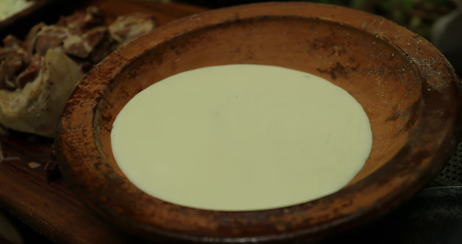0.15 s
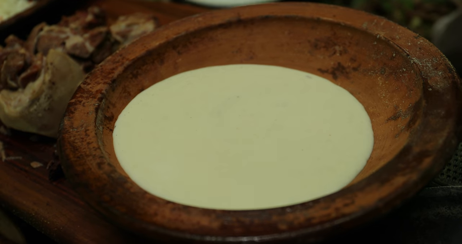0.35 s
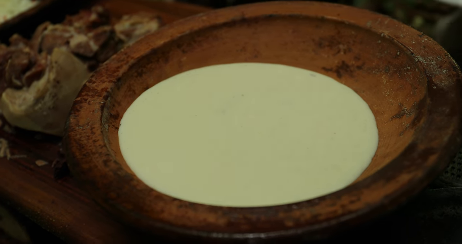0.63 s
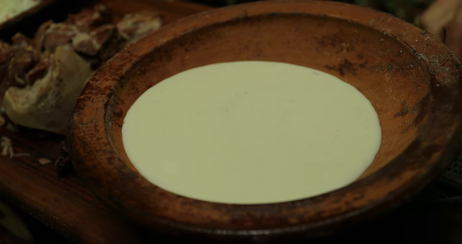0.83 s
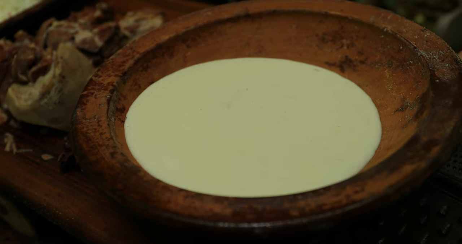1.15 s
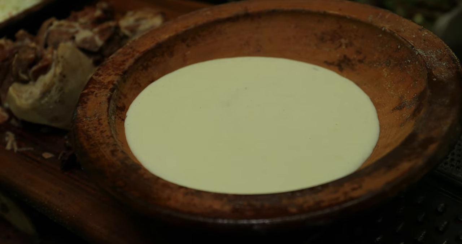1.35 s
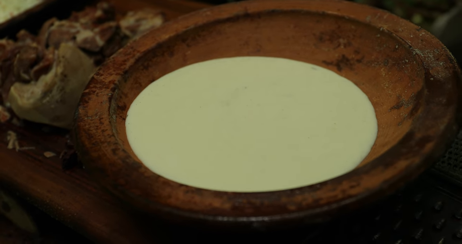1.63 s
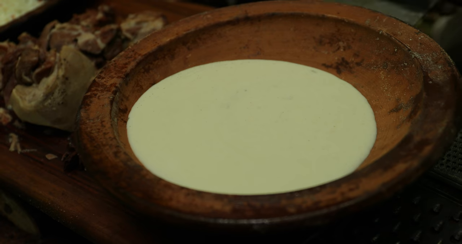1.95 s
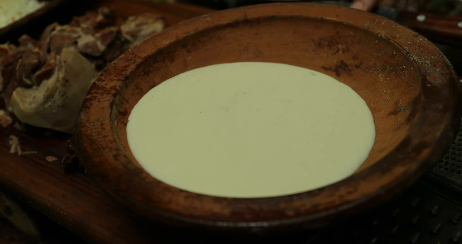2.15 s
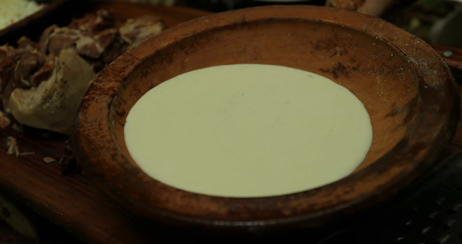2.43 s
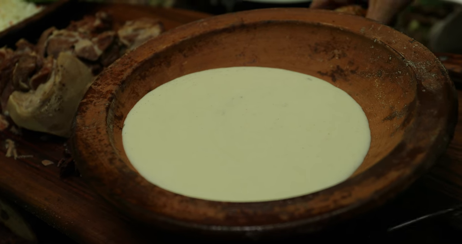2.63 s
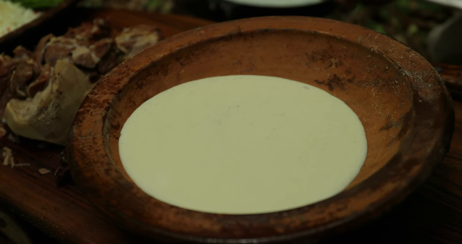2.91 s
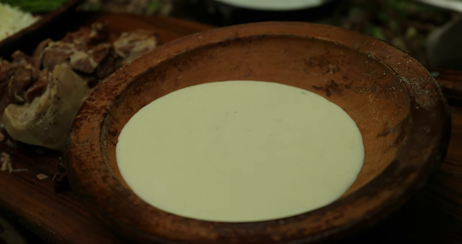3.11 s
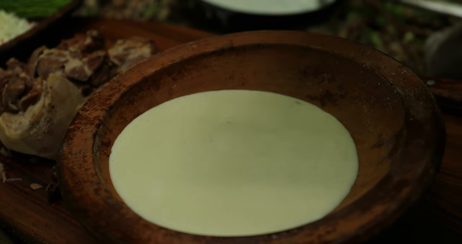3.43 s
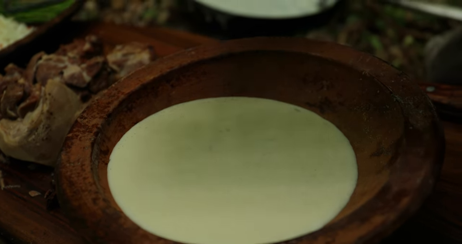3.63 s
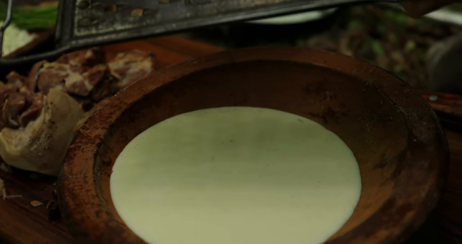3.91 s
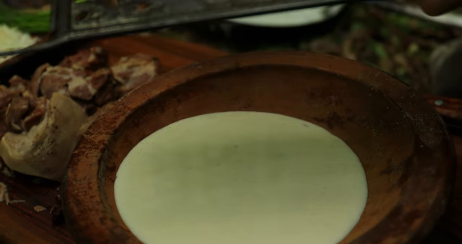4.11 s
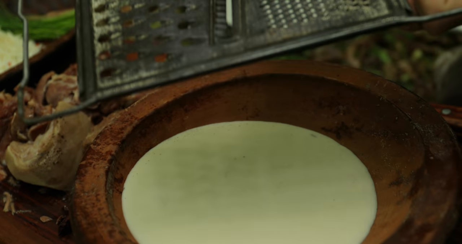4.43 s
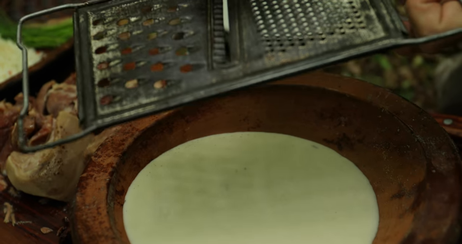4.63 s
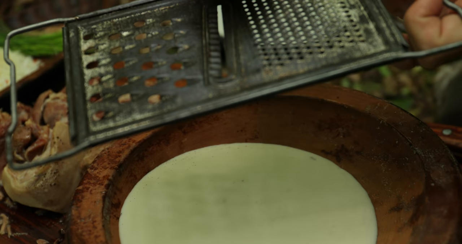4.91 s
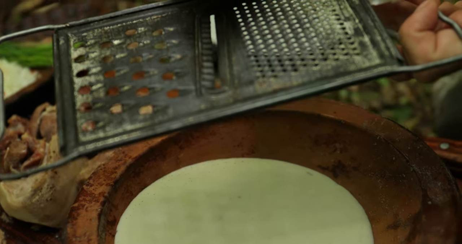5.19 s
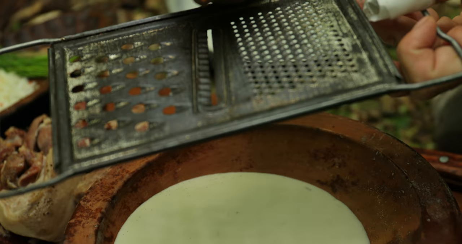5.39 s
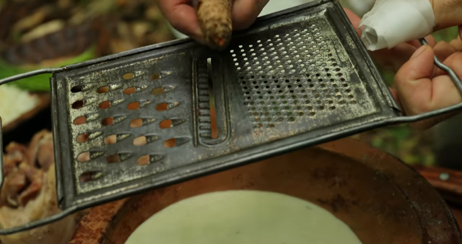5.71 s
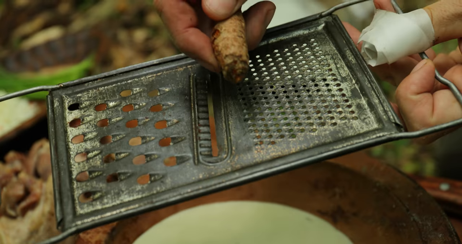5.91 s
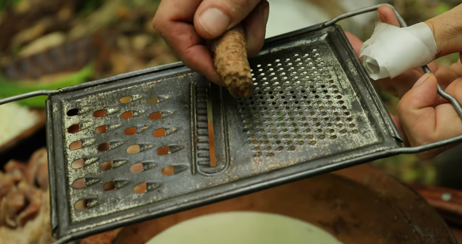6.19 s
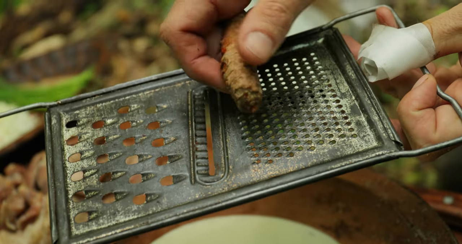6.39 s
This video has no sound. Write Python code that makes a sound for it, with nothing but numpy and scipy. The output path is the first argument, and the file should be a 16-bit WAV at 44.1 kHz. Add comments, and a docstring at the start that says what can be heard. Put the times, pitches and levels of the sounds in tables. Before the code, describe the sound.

Very close at an outdoor wooden table, a utensil lands with a sharp woody-metal clack. A tin grater is dragged in a long gritty scrape with light rattles, then after a pause is moved again in short scrapes and heavier knocks. From about three seconds only small handling ticks and faint dry rustles remain, with distant echoing birds, tiny watery blips and a low rumble that booms late.

```python
"""Outdoors at a wooden table, beside a dish of sauce: a utensil clacks down (damped modes and a noise crack),
then a tin grater is dragged, knocks and ticks (slips and short contacts ringing its modes).
Small birds sing far off among trees (gliding whistles, mostly echo) over a soft hush, dry rustles,
faint watery blips and a low rumble with booms. A limiter dips the whole mix briefly after its highest peaks.
"""
import sys
import numpy as np
from scipy import signal
from scipy.fft import rfft, irfft, next_fast_len
from scipy.io import wavfile
from scipy.ndimage import uniform_filter1d, minimum_filter1d, map_coordinates

SR = 44100
rng = np.random.default_rng(int(sys.argv[2]) if len(sys.argv) > 2 else 0)


def persist_wave(psi):
    """Save psi, clipped to +-1, as 16-bit WAV."""
    counts = np.round(np.clip(psi, -1, 1) * 32767).astype(np.int16)
    wavfile.write(sys.argv[1], SR, np.atleast_2d(counts).T)


N = 288836  # samples


def amp(db):
    """Decibels to gain."""
    return 10 ** (np.asarray(db) / 20)


def unit(x):
    """Scale to rms 1."""
    return x / np.sqrt(np.mean(x ** 2) + 1e-20)


def along(points, hz):
    """Read (Hz, value) points on a log frequency axis."""
    point_hz, value = np.transpose(points)
    return np.interp(np.log(hz + 1), np.log(point_hz + 1), value)


def wobble(knots_per_s):
    """Smooth random curve through normal-distributed knots."""
    knots = rng.standard_normal(int(N * knots_per_s / SR) + 4)
    return map_coordinates(knots, [np.arange(N) * knots_per_s / SR])


def filtered(x, response):
    """Multiply the spectrum of x by response(hz)."""
    n = x.shape[-1]
    padded = next_fast_len(n + SR // 10)
    spectrum = rfft(x, padded) * response(np.fft.rfftfreq(padded, 1 / SR))
    return irfft(spectrum, padded)[..., :n]


def coloured(x, spectrum):
    """Shape x by a (Hz, dB) spectrum, at rms 1."""
    return unit(filtered(x, lambda hz: amp(along(spectrum, hz))))


def cut(x, hz, kind, order):
    """Causal low-pass or high-pass."""
    corner_hz = min(hz, SR / 2 - SR / 20)
    return signal.sosfilt(signal.butter(order, corner_hz, kind, fs=SR, output="sos"), x)


def fade(t, t60):
    """Exponential decay, 60 dB in t60 seconds."""
    return np.exp(-np.log(1000) * t / t60)


def add(track, s, sound):
    """Mix a sound into a track from time s."""
    part = track[max(round(s * SR), 0):][:len(sound)]
    part += sound[:len(part)]


def ring(modes, t, strengths=1):
    """Sum of damped sine modes, each at its own strength."""
    hz, db, t60 = np.transpose(modes)[:, :, None]
    return (strengths * amp(db) * np.sin(2 * np.pi * hz * t) * fade(t, t60)).sum(0)


def grains(rate_per_s):
    """Tiny slips at random moments and of uneven size."""
    happens = rng.random(N) < rate_per_s / SR
    return happens * rng.standard_normal(N) * amp(2 * rng.standard_normal(N))


def swells(rows):
    """Gain of bell-shaped swells from (crest_s, half_width_s, level_db) rows."""
    t = np.arange(N) / SR
    return sum(amp(db) * np.exp(-((t - s) / width) ** 2) for s, width, db in rows)


def rush(spectrum, alike):
    """Stereo noise of rms 1; the mid-side balance sets the likeness of the sides."""
    def turn(hz):
        return np.arccos(np.clip(along(alike, hz), -1, 1)) / 2

    def mid_side(hz):
        return amp(along(spectrum, hz)) * [np.cos(turn(hz)), np.sin(turn(hz))]

    mid, side = filtered(rng.standard_normal((2, N)), mid_side)
    return unit(np.array([mid + side, mid - side]))


# hush spectrum: hz, relative level_db
AIR_SPECTRUM = [(59, -18), (100, -1), (244, -6.5), (295, -9), (389, -12), (524, -18.5), (648, -19.5),
                (691, -22), (910, -25.5), (1390, -22.5), (2130, -24), (2420, -24.5), (3190, -27.5),
                (5300, -28), (16000, -40)]
# left-right likeness of the hush: hz, correlation (-1 to 1)
AIR_LIKENESS = [(60, 0.99), (130, 0.93), (290, 0.95), (640, 0.87), (1410, 0.94), (3100, 0.61), (6820, 0.1),
                (15000, -0.28)]
HUSH_DB = -43.5


def air():
    """Hush of the woods: shaped stereo noise with a slight level waver."""
    return amp(HUSH_DB + 0.39 * wobble(5.2)) * rush(AIR_SPECTRUM, AIR_LIKENESS)


# rumble spectrum: hz, relative level_db
RUMBLE_SPECTRUM = [(20, -45), (26, -20), (31, -3), (38, -7), (47, 6), (57, 1), (72, -4), (100, -10),
                   (140, -16), (220, -24.5), (400, -56)]
# booms of the microphone support: crest_s, half_width_s, pitch_hz, level_db (before the left-right tilt)
SUPPORT_BOOMS = [(2.1, 0.27, 53.6, -36), (5.085, 0.041, 53.6, -25), (5.16, 0.056, 41.1, -26.5),
                 (5.6, 0.12, 43.7, -32.5), (5.88, 0.083, 57.7, -21), (6.13, 0.12, 55.74, -32.5)]


def rumble():
    """Low wavering noise; the microphone support booms in bell-shaped sine swells."""
    t = np.arange(N) / SR
    boom = np.zeros(N)
    for crest_s, half_width_s, hz, db in SUPPORT_BOOMS:
        tone = np.sin(2 * np.pi * (hz * t + rng.random()))
        boom += swells([(crest_s, half_width_s, db)]) * tone
    bed = amp(-40.0 + 2.7 * wobble(3.5)) * rush(RUMBLE_SPECTRUM, [(30, 0.072), (60, 0.27), (120, 0.99)])
    return amp([[1.5], [-1.5]]) * (bed + boom)  # louder at left


# rustle spectrum: hz, relative level_db
LEAF_SPECTRUM = [(400, -13.5), (750, 0), (1250, 0.5), (2200, -0.5), (2700, -11.5), (5000, -7), (10000, -24)]
# leaves and sleeves: crest_s, half_width_s, level_db
RUSTLE_SWELLS = [(3.15, 0.44, -60), (4.7, 0.38, -61), (6.32, 0.084, -57)]
LEAVES_DB = -62  # steady stir under the swells


def rustle():
    """Leaves and sleeves: soft clumps of dry grains."""
    level = amp(LEAVES_DB) + swells(RUSTLE_SWELLS)
    clumps = unit(amp(2.2 * wobble(25)))
    return level * clumps * coloured(grains(rate_per_s=1000), LEAF_SPECTRUM)


# clear watery blips: start_s, start_hz, level_db (before the onset and fade)
CLEAR_BLIPS = [(.095, 1210, -39), (0.73, 1167, -33.5), (1.389, 1190, -43.5), (1.48, 1250, -46),
               (1.555, 1910, -40), (4.471, 1170, -36), (4.597, 1087, -38.5), (4.648, 1750, -41),
               (4.711, 970, -42), (6.13, 800, -44), (6.28, 726, -39)]


def blips():
    """Watery blips: short sines of rising pitch, a few clear ones over 150 faint ones."""
    out, t = np.zeros(N), np.arange(SR // 10) / SR
    faint = [(a * N / SR, 600 * 4 ** b, -53 + 10 * c) for a, b, c in rng.random(size=(150, 3))]
    envelope = fade(t, .07) * (1 - np.exp(-t / .002))
    for s, hz, db in CLEAR_BLIPS + faint:
        add(out, s, amp(db) * np.sin(2 * np.pi * hz * t * (1 + .6 * t)) * envelope)
    return out


# utensil landing, then its metal end striking: start_s, peak_db (before placing)
CLACK_HITS = [(.2124, -6.5), (.2224, 3.5)]
# ring of the utensil: mode_hz, relative level_db, t60_s
UTENSIL_MODES = [(1377, 0.5, 0.05), (1430, -7.5, 0.079), (1550, 18, 0.011), (1670, -17.5, 0.2),
                 (1820, -10, 0.048), (2050, 0, 0.028), (2280, -11.5, 0.12), (2520, -33, 0.25),
                 (2920, -15, 0.056), (4880, -27, 0.062), (5630, -7, 0.015)]
# crack of the landing: hz, relative level_db
LANDING_SPECTRUM = [(300, -17), (1300, 17.5), (2000, -17), (3200, -16), (4400, 1.5), (5700, 2), (6500, -5),
                    (8000, -4), (15000, -35)]
# board under the utensil: mode_hz, relative level_db, t60_s
BOARD_MODES = [(370, -10, 0.065), (504, -0.5, 0.032), (586, 4.5, 0.034), (950, -7, 0.048),
               (1334, -6, 0.046)]


def clack():
    """Dull landing rings the board's modes, then the metal end rings its own."""
    out, t = np.zeros(N), np.arange(SR // 3) / SR
    (land_s, land_db), (hit_s, hit_db) = CLACK_HITS
    crack = coloured(rng.standard_normal(len(t)), LANDING_SPECTRUM) * fade(t, 0.085)
    wood = ring(BOARD_MODES, t) * (1 - np.exp(-t / 0.0015)) + 0.29 * crack
    metal = ring(UTENSIL_MODES, t) * (1 - np.exp(-t / 0.0022))
    metal += 0.035 * rng.standard_normal(len(t)) * fade(t, 0.0094)
    add(out, land_s, amp(land_db) * wood / abs(wood).max())
    add(out, hit_s, amp(hit_db) * metal / abs(metal).max())
    return out


# handling ticks: start_s, peak_db (before placing)
HANDLING_TICKS = [(0.4522, -26.5), (1.515, -34.5), (1.6783, -31.5), (3.4486, -38), (4.385, -38),
                  (4.803, -36), (5.3056, -35.5), (5.694, -29.5)]
# tick spectrum: hz, relative level_db
TICK_SPECTRUM = [(1500, -25), (5000, 4), (9000, 2), (14000, 4), (16000, -18)]
# fingers brushing: crest_s, half_width_s, level_db (before placing)
FINGER_BRUSHES = [(.43, .1, -47.5), (.584, 0.011, -44.5), (3.82, 0.048, -51.5)]


def handling():
    """Fingers tick (noise bursts) and brush (swelling grains) on dry things."""
    out, t = np.zeros(N), np.arange(SR // 20) / SR
    for s, db in HANDLING_TICKS:
        tick = coloured(rng.standard_normal(len(t)), TICK_SPECTRUM) * fade(t, 0.0083)
        add(out, s, amp(db) * tick / abs(tick).max())
    skin = coloured(grains(rate_per_s=1900), [(800, 1), (2500, 1.0), (7000, 0.5), (16000, -6)])
    return out + swells(FINGER_BRUSHES) * skin


def stroke(s, length_s, attack_s, sag_db_per_s, release_t60_s):
    """Gain of one push: rises, sags while it lasts, dies away."""
    t = np.arange(N) / SR - s
    sag = amp(-sag_db_per_s * np.clip(t, 0, length_s))
    return np.clip(t / attack_s, 0, 1) * sag * fade(np.maximum(t - length_s, 0), release_t60_s)


# drags of the grater's edge: start_s, length_s, relative grind_db, relative rasp_db
EDGE_SCRAPES = [(0.771, 0.16, -36.5, -40.5), (0.902, 0.34, -24, -30), (1.998, 0.038, -32.5, -56),
                (2.042, 0.055, -21, -57), (2.29, 0.052, -27, -29.5), (2.486, 0.028, -23.5, -36),
                (2.676, 0.036, -20, -20.5), (2.739, 0.034, -28, -62)]
# the hand bears down quickly, then eases off
GRIND_ATTACK_S, GRIND_SAG_DB_PER_S, GRIND_RELEASE_T60_S = 0.019, 25.5, 0.081


def pressure():
    """How hard the edge bears on the table, as the gain of its grinding."""
    shape = GRIND_ATTACK_S, GRIND_SAG_DB_PER_S, GRIND_RELEASE_T60_S
    return sum(amp(db) * stroke(s, length_s, *shape) for s, length_s, db, _ in EDGE_SCRAPES)


# grater lying on the table: mode_hz, relative level_db, t60_s (before grip damping)
GRATER_MODES = [(274, 6, 0.047), (328.3, -2.5, 0.13), (431, -6.5, 0.11), (523.2, -2, .1), (637, 0, 0.021),
                (746.5, 0.5, 0.11), (888, -2, 0.071), (1107, .5, 0.068), (1189, -4.5, .15),
                (1290, -5, 0.064), (1579, 4, 0.047), (1690, -0.5, 0.049), (1770, -20, 0.75),
                (2000, 10, 0.0083), (2120, 4.5, 0.047), (2263, -8, 0.16), (2583, -3.5, 0.099),
                (2866, -4.5, 0.12), (3130, -3.5, 0.088), (3775, -8.5, .3), (4590, 2.5, 0.024),
                (4950, 7.5, 0.031), (5800, 7.5, 0.019), (6140, 10, 0.027)]
# knocks on the wood: start_s, relative level_db, contact_ms
WOOD_KNOCKS = [(0.664, -35.5, 0.24), (.9113, -25, 0.11), (.9425, -16, 0.31), (.9652, -22, 0.066),
               (.98, -15, 0.23), (1.017, -27, 0.26), (1.102, -26.5, 0.041), (1.136, -26, 0.039),
               (1.193, -31, 0.033), (1.243, -36.5, 0.33), (2.008, -30, 0.66), (2.065, -28, 0.36),
               (2.092, -29, 0.42), (2.285, -17, 0.16), (2.3021, -20.5, 0.26), (2.3444, -19.5, 0.19),
               (2.36, -23.5, 0.24), (2.3641, -12, 1.1), (2.4817, -13, 1.04), (2.498, -32, 0.45),
               (2.542, -30, 1.66), (2.6901, -27, 0.31), (2.704, -11.5, 0.97), (2.706, -28.5, 0.18),
               (2.7113, -14, 1.03), (2.7487, -30, 0.23), (2.783, -16, 1.22), (2.8082, -16.5, .75),
               (2.817, -20, 0.95), (2.8796, -28.5, 1.85), (3.801, -42, 0.22)]
FREE_T60_S, PRESSED_T60_S = 0.88, 0.022  # extra grip damping: held loosely, pressed hardest


def knocks():
    """Short contacts ring the tin brightly; long ones thud in the table."""
    out, t = np.zeros(N), np.arange(SR // 3) / SR
    press = pressure()
    for s, db, contact_ms in WOOD_KNOCKS:
        press_share = press[round(s * SR)] / press.max()
        grip_t60_s = FREE_T60_S * (PRESSED_T60_S / FREE_T60_S) ** (press_share ** 2)
        board = rng.standard_normal(len(t)) * fade(t, 0.032)  # noise for crowded modes
        board = 7.4 * cut(board, 1850, "low", order=1)
        # each spot favours other modes
        mode_shape = (len(GRATER_MODES), 1)
        spot = rng.choice([-1, 1], mode_shape) * amp(2 * rng.standard_normal(mode_shape))
        blow = (ring(GRATER_MODES, t, spot) * .5 + board) * fade(t, grip_t60_s)
        blow = cut(blow * (1 - np.exp(-t / 0.00077)), 1250 / contact_ms, "low", order=4)
        blow = cut(blow, 600 / contact_ms + 5500, "low", order=3)  # wood gives way, blunts the contact
        blow = cut(blow, 210 + 45 / contact_ms, "high", order=4)  # a light touch barely moves the table
        # short, hard contacts click most
        tick = cut(rng.standard_normal(len(t)), 7900, "low", order=3) * fade(t, 0.012)
        tick *= amp(10.5 - 66 * contact_ms)
        add(out, s, amp(db) * (blow / np.std(blow[:SR // 100]) + tick))
    return out


# grind spectrum: hz, relative level_db
GRIND_SPECTRUM = [(150, -33), (230, -29), (330, 0.5), (530, -2), (640, -21.5), (830, 1), (1200, -7),
                  (1400, -6.5), (1620, -3), (2500, -16), (4500, -16), (7000, -39), (12000, -61)]
# rasp spectrum: hz, relative level_db
RASP_SPECTRUM = [(1500, -11), (2800, -0.5), (5000, -1.5), (7000, 1), (10000, -9.5), (14500, -16),
                 (16000, -27)]
# the teeth bite as the edge gathers speed
RASP_ATTACK_S, RASP_SAG_DB_PER_S, RASP_RELEASE_T60_S = 0.22, 19.5, 0.028
TEETH_RING_DB = -3  # tin ring relative to the teeth


def drag():
    """The edge slips over the wood grain: slips ring the body, grit grinds, teeth rasp."""
    grind = pressure()
    rasp_shape = RASP_ATTACK_S, RASP_SAG_DB_PER_S, RASP_RELEASE_T60_S
    rasp = sum(amp(db) * stroke(s, length_s, *rasp_shape) for s, length_s, _, db in EDGE_SCRAPES)
    catch = unit(amp(1.85 * wobble(120)))  # the edge catches and frees itself
    body = ring(GRATER_MODES, np.arange(SR // 3) / SR)
    slips = coloured(grains(rate_per_s=1400), GRIND_SPECTRUM)
    steady_ring = signal.fftconvolve(slips, body)[:N]
    tin = signal.fftconvolve(slips * grind * catch, body)[:N] / np.std(steady_ring)
    grit = grind * catch * coloured(grains(rate_per_s=550), GRIND_SPECTRUM)
    grit = cut(grit, 1350, "high", order=3)
    bite = unit(amp(1.44 * wobble(110)))
    teeth = rasp * bite * coloured(grains(rate_per_s=1400), RASP_SPECTRUM)
    sing = signal.fftconvolve(teeth, body)[:N]
    sing *= amp(TEETH_RING_DB) * np.std(teeth) / np.std(sing)
    return amp(-1.0) * tin + amp(-7.5) * grit + teeth + sing


# bird notes: start_s, start_hz, glide_octaves_per_s, relative level_db
BIRD_NOTES = [(1.505, 4384, -4.5, -49.5), (1.62, 3750, 0.5, -48), (1.789, 4180, 0.5, -52.5),
              (2.42, 5720, 1.5, -52.5), (2.59, 6070, 2, -55), (2.83, 3850, 0.5, -52),
              (2.945, 4070, 2.4, -51), (3.068, 4480, 2, -50), (3.25, 4290, 0.5, -56), (3.44, 5300, 1, -51),
              (3.586, 4750, -1.1, -48), (3.78, 4670, 1, -53.5), (4.351, 1710, -0.5, -56),
              (4.46, 2080, -0.8, -58), (4.75, 2366, -0.5, -55.5)]
NOTE_S, TRILL = 0.094, .065  # note length; waver as a share of the pitch


def bird():
    """Gliding whistles: a nearly clean core and a quick, uneven trill around it."""
    out, t = np.zeros(N), np.arange(round(NOTE_S * SR)) / SR
    waver = wobble(500)
    for s, start_hz, glide, db in BIRD_NOTES:
        hz = start_hz * 2 ** (glide * t)
        trill = TRILL * waver[round(s * SR):][:len(t)]
        cycles = np.cumsum([hz * (1 + trill / 10), hz * (1 + trill)], axis=1) / SR
        core, buzz = np.sin(2 * np.pi * cycles)
        add(out, s, amp(db) * np.sqrt(np.hanning(len(t))) * (core + buzz) / np.sqrt(2))
    return out


# echo decay among the trees: hz, t60_s
TREE_DECAY = [(300, 0.17), (2000, 0.36), (5000, 1), (12000, 0.72)]


def trees(x):
    """Trunks scatter a thin echo: decaying noise, different on each side."""
    hz, t, noise = signal.stft(rng.standard_normal((2, SR)), SR, nperseg=256)
    decay = fade(t, along(TREE_DECAY, hz)[:, None])
    tail = signal.istft(noise * decay, SR, nperseg=256)[1]
    return signal.fftconvolve(x[None], tail / np.linalg.norm(tail[0]), axes=1)[:, :N]


def placed(x, lag_ms, pan_db):
    """Positive lag delays the left, positive pan lifts it; dish and table scatter the treble."""
    side = np.array([[1], [-1]]) / 2  # left, right
    lag_s = side * lag_ms / 10 ** 3
    direct = amp(side * pan_db) * filtered(x, lambda hz: np.exp(-2j * np.pi * hz * lag_s))
    t = np.arange(SR // 100) / SR
    echoes = rng.standard_normal((2, len(t))) * fade(t, 0.029)
    echoes = cut(echoes / np.linalg.norm(echoes[0]), 6200, "high", order=2)
    return direct + signal.fftconvolve(x[None], echoes, axes=1)[:, :N]


def scene():
    """Near, dry work at the table; the birds are mostly echo."""
    table = knocks() + drag() + handling()
    utensil, song = clack(), bird()
    near = placed(table, lag_ms=0.049, pan_db=1.0) + placed(utensil, lag_ms=0.02, pan_db=1.0)
    echo = amp(-21.0) * trees(table + utensil)
    birds = amp(6.5) * (song / 2 + trees(song))
    return near + echo + birds + blips() + rustle() + air() + rumble()


TOP_HZ = 16000


def record(dry):
    """A limiter holds the gain down for 75 ms after each peak; then a band limit at TOP_HZ."""
    need = np.minimum(1, .72 / (abs(dry).max(0) + 1e-9))
    hold = 2 * round(.075 * SR / 2) + 1  # samples
    gain = uniform_filter1d(minimum_filter1d(need, hold, origin=hold // 2), size=12)
    return filtered(dry * gain, lambda hz: hz < TOP_HZ)


dry = scene()
out = record(dry)
persist_wave(out)
```